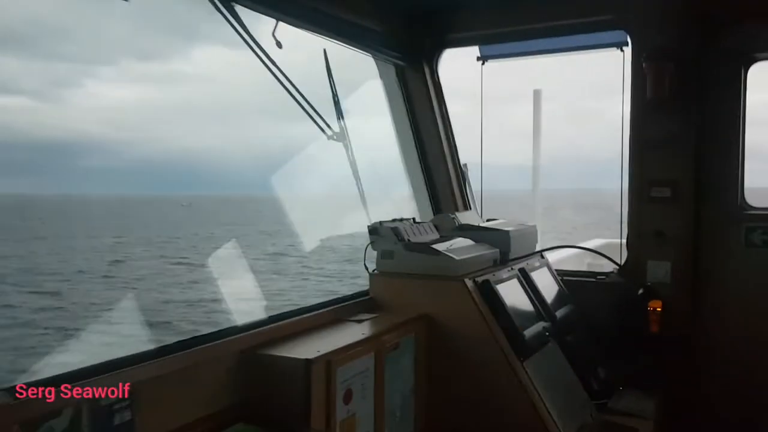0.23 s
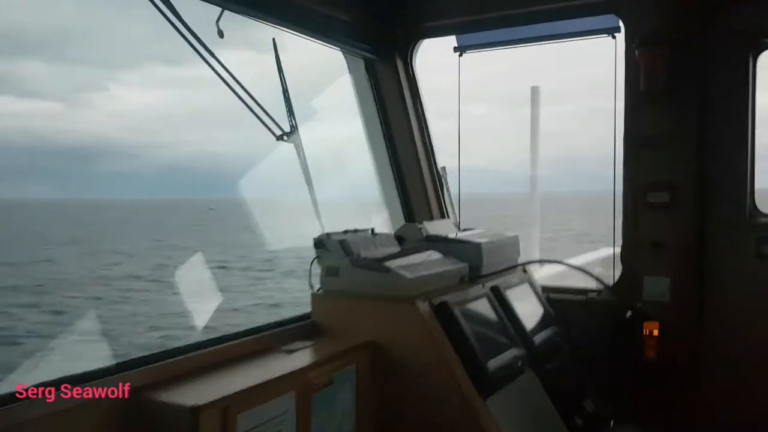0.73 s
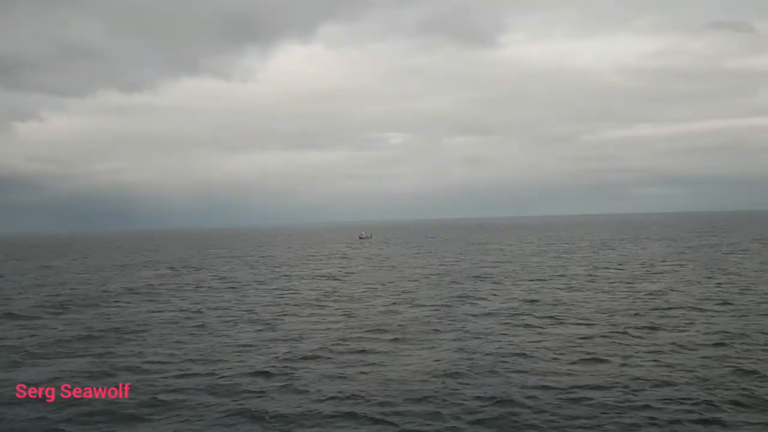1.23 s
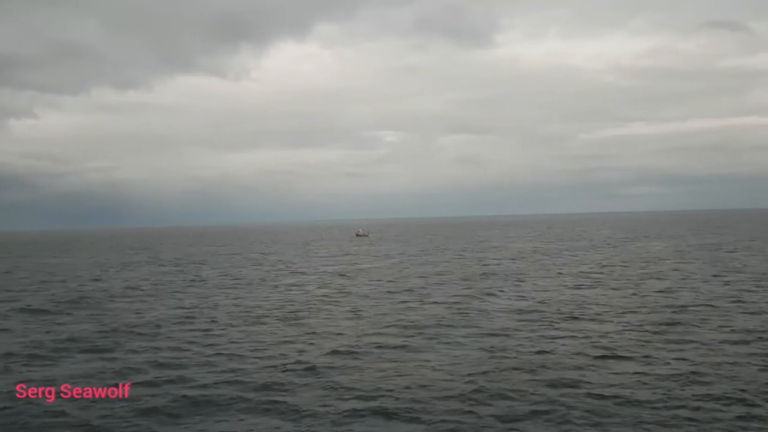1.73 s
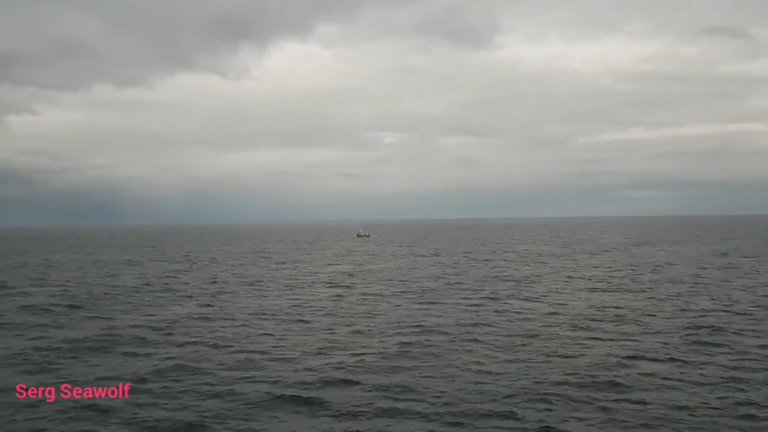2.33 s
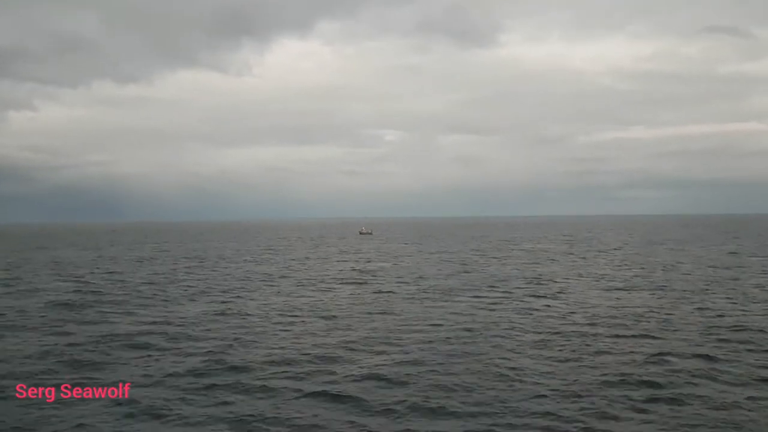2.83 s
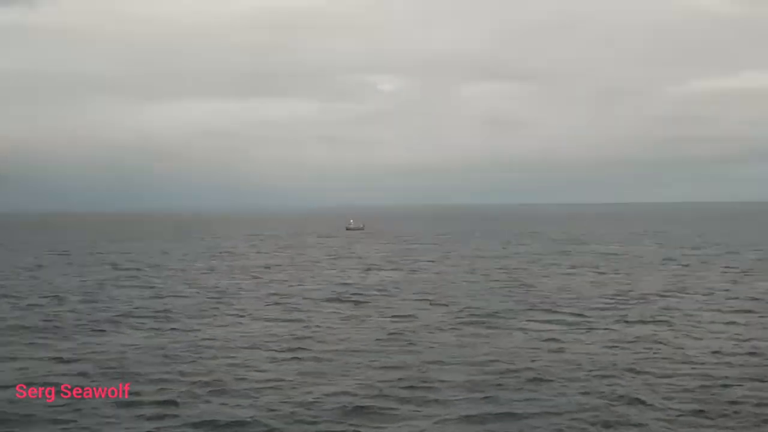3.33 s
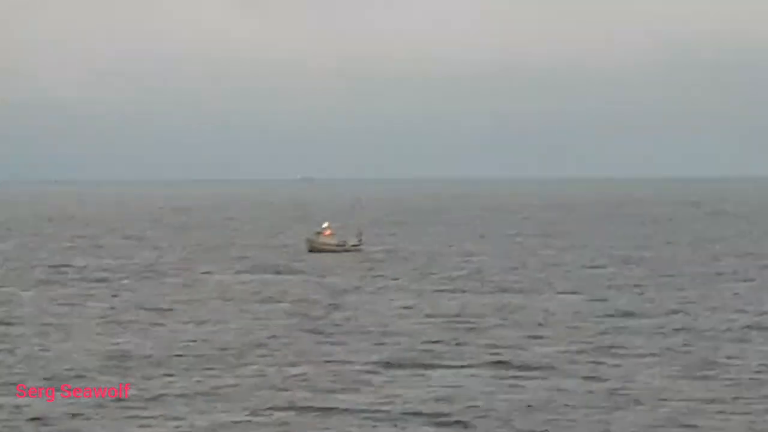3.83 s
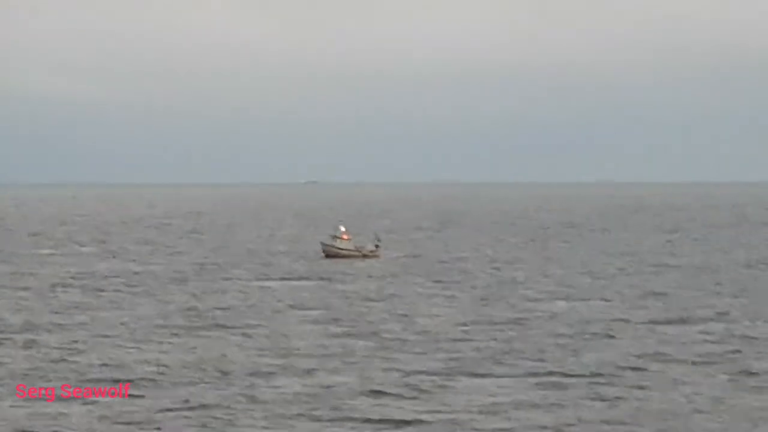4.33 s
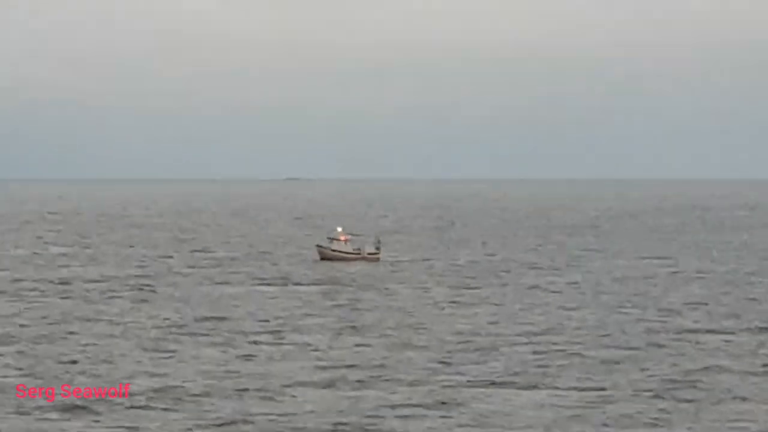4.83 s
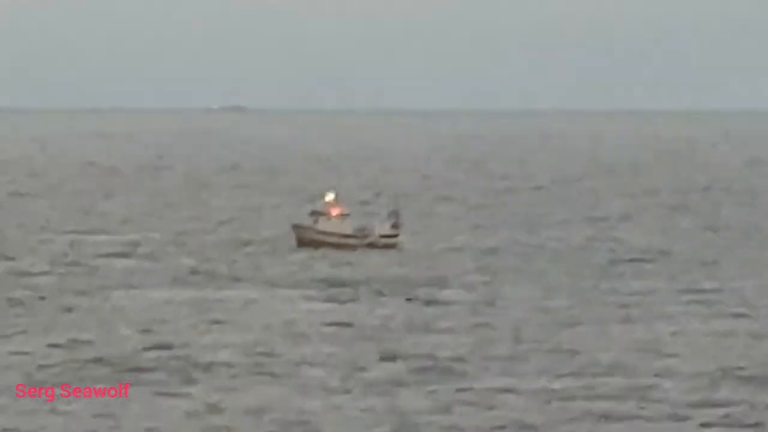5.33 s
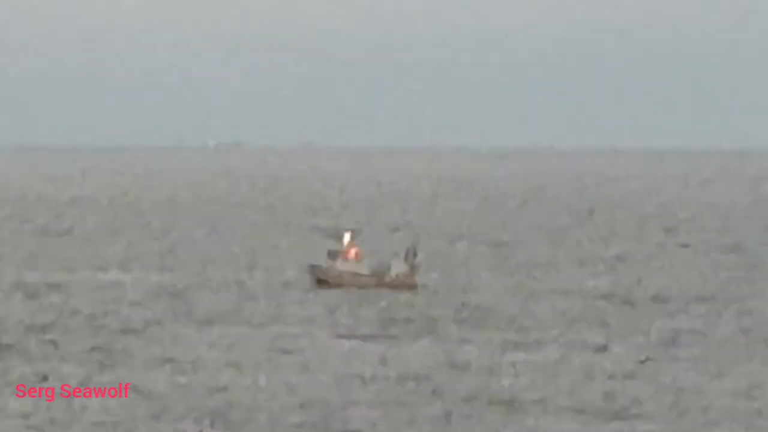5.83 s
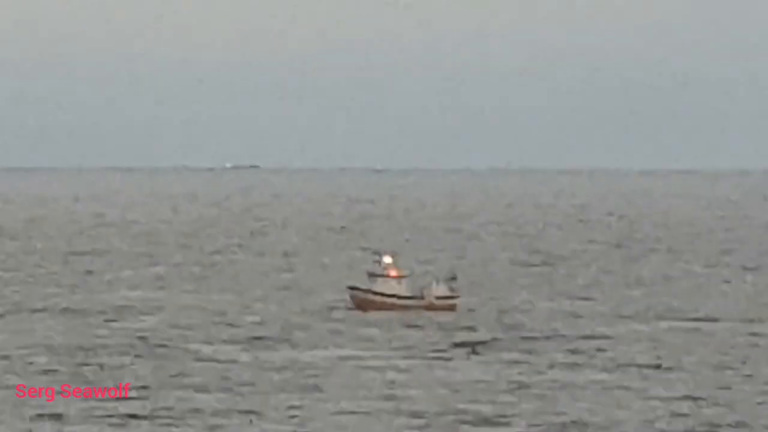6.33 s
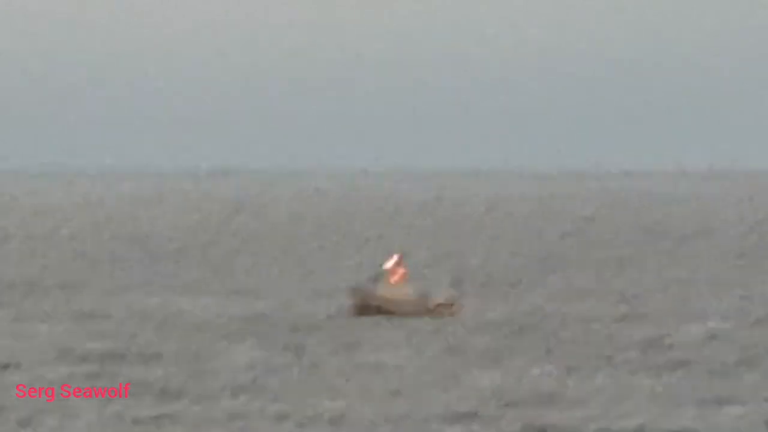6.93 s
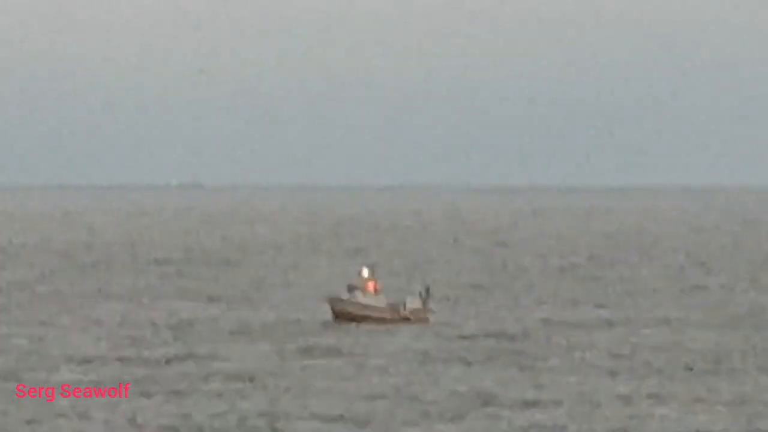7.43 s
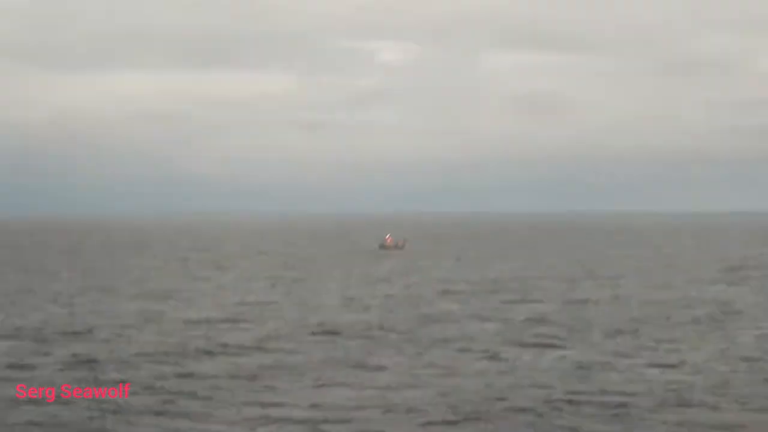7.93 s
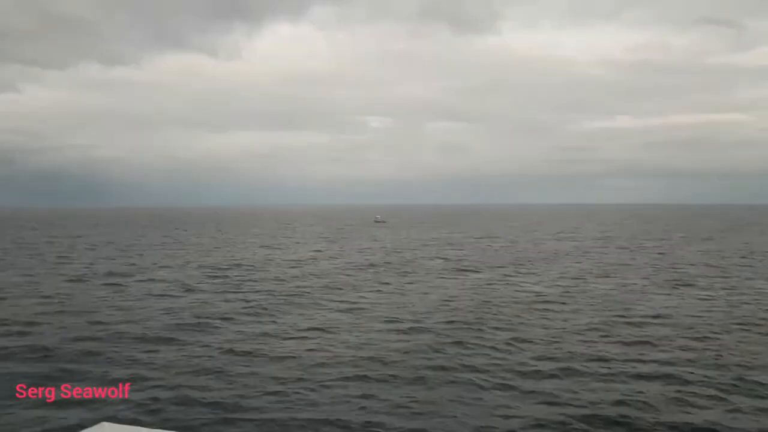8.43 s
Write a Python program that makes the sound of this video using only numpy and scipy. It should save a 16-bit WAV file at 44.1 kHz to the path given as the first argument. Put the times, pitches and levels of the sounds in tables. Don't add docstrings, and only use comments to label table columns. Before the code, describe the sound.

From 0 to 1.65 seconds, a quiet ship's wheelhouse: a low electrical hum around 240 hertz fades beneath faint ventilation tones and dull, dark room noise. At about 1.4 a very soft sleeve swish passes. At 1.65 a small click and hard cut opens onto the deck. Wind now dominates, buffeting a hand-held stereo microphone in low, ragged, fluttering thumps and quick snaps that strike left and right independently. A hard left-heavy burst comes at 2.4, easing around 2.8 to 3.1; strong right-side blows follow at 3.6 and 4.2. It is calmer near 4.8 to 5.1, gusty around 5.3 to 6.2, and lighter from 6.3 to 7. The heaviest slam hits right at 7.4, then buffeting continues to 8.7. Brief crackles mark overloads. Beneath lie steady low engine drone, left-leaning sea wash and thin hiss, rising and falling with gain.

```python
import sys
import numpy as np
from scipy import signal
from scipy.fft import rfft, irfft, next_fast_len
from scipy.io import wavfile
from scipy.ndimage import uniform_filter1d, minimum_filter1d, map_coordinates

SR = 44100
rng = np.random.default_rng(int(sys.argv[2]) if len(sys.argv) > 2 else 0)


def persist_wave(psi):
    counts = np.round(np.clip(psi, -1, 1) * 32767).astype(np.int16)
    wavfile.write(sys.argv[1], SR, np.atleast_2d(counts).T)


def voltage_ratio(level):
    return 10 ** (np.asarray(level, float) / 20)


N = 383229
TIME_S = np.arange(N) / SR
CUT_S = 1.6545


def rms_one(x):
    return x / np.sqrt(np.mean(x ** 2) + 1e-20)


def in_time(rows):
    s, *columns = np.transpose(rows)
    return [np.interp(TIME_S, s, c) for c in columns]


def at_hz(points, hz):
    point_hz, value = np.transpose(points)
    return np.interp(np.log(hz), np.log(point_hz), value)


def band(x, low_hz, high_hz, order):
    return signal.sosfilt(signal.butter(order, [low_hz, high_hz], "band", fs=SR, output="sos"), x)


def drift(rate):
    r = np.exp(-80 * np.pi * rate / SR)
    slow = signal.lfilter([1], [1, -2 * r, r * r], rng.standard_normal(N // 40 + 2002))[2000:]
    return np.interp(np.arange(N) / 40, np.arange(len(slow)), rms_one(slow))


def background(spectrum, direct, left_lag_s, ref_hz):
    size = next_fast_len(N)
    hz = np.maximum(np.arange(size // 2 + 1) * SR / size, 1)
    common, left, right = rfft(rng.standard_normal((3, size)))
    share = np.clip(at_hz(direct, hz), 0, 1)
    one_sided = np.sqrt(share) * common * np.exp(-2j * np.pi * hz * left_lag_s * [[1], [0]])
    diffuse = np.sqrt(1 - share) * np.array([left, right])
    pair = (one_sided + diffuse) * voltage_ratio(at_hz(spectrum, hz))
    level = np.sqrt(2 * np.sum(voltage_ratio(at_hz(spectrum, hz[hz > ref_hz])) ** 2) / size)
    return irfft(pair, size)[:, :N] / level


def tones(lines, wobble_db, wander_rad):
    total = np.zeros(N)
    for hz, level_db in lines:
        level = np.sqrt(2) * voltage_ratio(level_db + wobble_db * drift(8.5))
        total += level * np.sin(2 * np.pi * hz * TIME_S + wander_rad * drift(0.89))
    return total


# (time [s], hiss level [dB])
GAIN = [(1.7, -88.5), (2.31, -84.5), (2.51, -92), (3.35, -85), (3.52, -80), (3.72, -78.5), (3.91, -78.5),
        (4.06, -85.5), (4.29, -90), (4.89, -86), (5.1, -84), (5.6, -78), (6.23, -83), (6.52, -83.5),
        (6.83, -77), (7.08, -77.5), (7.37, -84), (8.6, -84)]


def deck_hiss_db():
    return in_time(GAIN)[0]


# (frequency [Hz], density [dB per Hz])
HISS_SPECTRUM = [(6000, -14), (8100, -7), (9600, -8), (11100, -3), (13100, -1.5), (15100, 1.5),
                 (15800, 1.5), (16200, -39.5)]


def preamp_hiss(outside, hiss_db):
    hiss = background(HISS_SPECTRUM, [(8000, .1), (15000, .65)], left_lag_s=0, ref_hz=11000)
    return hiss * voltage_ratio(np.where(outside, hiss_db + 0.2, -78.3))


# (time [s], transformer hum [dB], room noise [dB])
CABIN_LEVELS = [(0.0, -25, -43.5), (.3, -28.5, -45), (.5, -29.5, -44.5), (.7, -32, -44.5), (.9, -34, -44.5),
                (1.2, -37.5, -45), (1.65, -36.5, -43.5)]
# (frequency [Hz], density [dB per Hz])
CABIN_AIR = [(20, 3), (45, 0), (90, -4.5), (130, -6), (190, -8), (280, -15.5), (400, -22), (600, -25),
             (800, -31), (1100, -31.5), (2000, -43), (3200, -51), (5000, -62.5), (8000, -73)]
# (frequency [Hz], share [0-1])
CABIN_DIRECT = [(61, 1), (310, 0.7), (610, 0.3), (1510, 0.1), (4100, 0.4)]
# (frequency [Hz], level [dB])
CABIN_LINES = [(48.5, -53), (118.5, -39), (560, -61), (592.3, -57.5), (1185, -69.5), (1205, -82.5),
               (1379, -75.5), (3550, -84)]


def wheelhouse():
    hum_db, room_db = in_time(CABIN_LEVELS)
    ventilation = tones(CABIN_LINES, wobble_db=1.8, wander_rad=0.99)
    hum = voltage_ratio(hum_db) * tones([(237.0, 0.2)], wobble_db=1.0, wander_rad=1.0)
    room = voltage_ratio(room_db) * background(CABIN_AIR, CABIN_DIRECT, left_lag_s=-.00044, ref_hz=300)
    return ventilation + hum + room


# (frequency [Hz], density [dB per Hz])
WASH_SPECTRUM = [(20, -14), (45, 3.5), (90, -5), (130, -2.5), (200, -8.5), (300, -20), (450, -24),
                 (700, -26.5), (1100, -29), (1700, -34), (2500, -41), (3600, -51), (5500, -60.5),
                 (8000, -78)]
# (frequency [Hz], share [0-1])
WASH_DIRECT = [(61, 1), (210, 0.99), (610, .61), (2100, 0.16), (5100, 0.047)]


def sea_wash():
    wash = background(WASH_SPECTRUM, WASH_DIRECT, left_lag_s=.00033, ref_hz=300)
    return wash * voltage_ratio(-40.0 + 0.72 * drift(5.4)) * voltage_ratio([[1.6], [-1.6]])


# (frequency [Hz], level [dB])
ENGINE_LINES = [(56.6, -31), (75.3, -30), (113.1, -32.5), (150.6, -41.5), (246, -44), (376.7, -61),
                (1027, -61)]


def engine():
    return tones(ENGINE_LINES, wobble_db=0.8, wander_rad=.75)


def rustle():
    centre_s, level_db, spread_ms = 1.41, -68.5, 67
    bell = np.exp(-.5 * ((TIME_S - centre_s) * 1000 / spread_ms) ** 2)
    return voltage_ratio(level_db) * bell * rms_one(band(rng.standard_normal((2, N)), 2800, 4600, order=2))


# (time [s], peak level [dB], left-right [dB])
TICKS = [(1.6546, -48, -11), (2.176, -65, -6.5), (2.4672, -51, 21.5), (2.515, -62.5, 13),
         (3.9249, -53.5, -17), (4.040, -54, -17), (4.202, -59, -18.5), (5.8772, -49.5, -27),
         (6.0002, -58.5, 20), (8.0608, -64.5, 15.5), (8.1867, -62, 1.5)]


def ticks():
    s, peak_db, pan_db = np.transpose(TICKS)
    fizz_spread_ms, fizz_db = 7.6, -27.5
    clicks = np.zeros((2, N))
    clicks[:, (s * SR).astype(int)] = voltage_ratio(peak_db + 22 + np.minimum(pan_db * [[1], [-1]], 0))
    overloads = clicks * (np.arange(N) > (CUT_S + .01) * SR)
    bell = signal.windows.gaussian(2001, fizz_spread_ms * SR / 1000)
    fizz = signal.fftconvolve(overloads, bell[None], "same") * rng.standard_normal((2, N))
    fizz *= voltage_ratio(fizz_db + 4.1 * drift(120))
    return band(fizz, 3500, 9000, order=2) + band(clicks, 2600, 9500, order=1)


def port_wind(eddies, low_hz, slow_edge, flutter, lumpy_db, trim_db):
    out, reach = np.zeros(N + 40000), 12000
    white = rng.standard_normal((len(eddies), 2 * reach), dtype=np.float32)
    shake = 2 * np.tanh(np.stack([drift(66.5), drift(70.0)]) / 2)
    largest = signal.butter(1, low_hz, "high", fs=SR, output="sos")
    for (s, peak_db, spread_ms, corner_hz), noise in zip(eddies, white):
        half = min(int(5.5 * spread_ms * SR / 1000), reach - 2000)
        need = min(reach, 2 * half + 1500)
        at = round(s * SR) + np.arange(-half, half)
        bell = np.exp(-.25 * ((at / SR - s) * 1000 / spread_ms) ** 2)
        pole = np.exp(-2 * np.pi * np.clip(1.27 * corner_hz, 30, 3000) / SR)
        fall = [[0.74, 0.00087, 0.019, 1, -2 * pole, pole ** 2]] * 2
        pattern = signal.sosfilt(fall, noise[reach - need:reach + need])
        pattern = signal.sosfilt(largest, pattern)
        jolt, lump = shake[:, np.minimum(at, N - 1)]
        gust = np.exp(flutter * jolt)
        travel = np.cumsum((slow_edge + (1 - slow_edge) * bell) * gust)
        swept = map_coordinates(pattern, [need + travel - travel[half]], order=3, mode="mirror")
        swept *= bell * voltage_ratio(lumpy_db * lump) * gust
        strength = np.sqrt(np.sum(band(swept, 100, 2400, order=2) ** 2) / np.sum(bell ** 2))
        out[at] += voltage_ratio(peak_db + trim_db) * swept / strength
    return out[:N]


def shed(strength):
    every_s, spread_ms, corner_at_ref_hz = .045, 12.0, 260
    beat = np.arange(1.72, N / SR, every_s)
    late, louder, longer, brighter = rng.standard_normal((len(beat), 4)).T
    s = beat + .3 * every_s * late
    db = np.interp(s, *np.transpose(strength)) + 2.5 * louder
    octaves = 0.1068 * (db + 22.5) + .6 * np.tanh(brighter)
    return list(zip(s, db, spread_ms * np.exp(.45 * longer), corner_at_ref_hz * 2 ** octaves))


# (time [s], strength [dB])
LEFT_BREEZE = [(1.7, -31.5), (1.86, -24), (2.26, -26.5), (2.55, -14.5), (2.8, -26.5), (2.96, -29),
               (3.3, -25), (3.58, -27.5), (3.85, -22), (4.45, -25.5), (4.75, -40), (5.35, -25.5),
               (6.05, -24), (6.38, -40.5), (7.1, -26), (7.55, -29.5), (7.8, -21.5), (8.69, -19.5)]
RIGHT_BREEZE = [(1.74, -23.5), (1.84, -34.5), (2.3, -24.5), (2.65, -21.5), (2.9, -42.5), (3.2, -35),
                (3.42, -24.5), (3.78, -29), (4.1, -17.5), (4.6, -28.5), (5.1, -33.5), (5.9, -30.5),
                (6.3, -35), (7.05, -34), (7.4, -17.5), (7.85, -25.5), (8.15, -36.5), (8.69, -20)]


def breeze():
    return [port_wind(shed(strength), low_hz=69.0, slow_edge=.7, flutter=0.12, lumpy_db=3.0, trim_db=0.5)
            for strength in (LEFT_BREEZE, RIGHT_BREEZE)]


# (time [s], peak level [dB], corner [Hz])
LEFT_SNAPS = [(1.855, -29.5, 350), (2.21, -24, 350), (2.342, -7.5, 450), (2.384, -8, 1060),
              (2.467, -17, 900), (2.495, -12, 850), (2.528, -18.5, 703), (2.566, -17.5, 890),
              (2.59, -20, 950), (2.659, -15, 694), (3.059, -24.5, 650), (3.164, -28, 380),
              (3.773, -23, 850), (3.856, -15.5, 454), (3.951, -16, 600), (4.103, -19.5, 470),
              (4.205, -16, 950), (5.178, -19, 483), (5.221, -22.5, 680), (6.001, -16, 750),
              (7.016, -24.5, 350), (7.378, -13.5, 1195), (7.75, -13, 407), (7.786, -12.5, 560),
              (7.812, -12.5, 760), (8.013, -17.5, 610), (8.066, -17.5, 937), (8.142, -19.5, 600),
              (8.578, -19.5, 890), (8.6, -14, 624)]
RIGHT_SNAPS = [(2.003, -22.5, 800), (2.172, -30, 640), (2.429, -13.5, 1060), (2.512, -23, 600),
               (2.613, -21, 780), (3.307, -21.5, 610), (3.38, -25, 680), (3.457, -13, 447),
               (3.974, -23.5, 520), (4.039, -14, 650), (4.229, -21, 594), (4.503, -15.5, 513),
               (4.527, -25, 843), (4.717, -17.5, 427), (4.969, -28.5, 300), (5.587, -22, 400),
               (5.878, -13, 600), (5.932, -18, 800), (6.474, -25.5, 447), (7.228, -16, 620),
               (7.257, -13.5, 580), (7.279, -24.5, 686), (7.433, -5.5, 840), (7.567, -16, 745),
               (7.65, -17, 576), (7.73, -22, 720), (8.228, -15, 685), (8.251, -9, 750), (8.275, -18, 750),
               (8.677, -14, 420)]


def snaps():
    spread_ms = 2.83
    pair = []
    for rows in (LEFT_SNAPS, RIGHT_SNAPS):
        whirls = [(s, db, spread_ms, hz) for s, db, hz in rows]
        pair.append(port_wind(whirls, low_hz=260.0, slow_edge=.8, flutter=0.025, lumpy_db=6.5, trim_db=1.5))
    return pair


# (time [s], peak level [dB], spread [ms], corner [Hz])
LEFT_EDDIES = [(1.97, -21.5, 17.5, 270), (2.103, -20.5, 12.7, 243), (2.395, -7, 20, 400),
               (2.471, -9, 12.6, 570), (2.506, -13, 9.4, 745), (2.612, -11, 16, 817),
               (2.71, -17.5, 18, 420), (3.05, -19.5, 16.3, 380), (3.342, -18.5, 9.2, 167),
               (3.485, -15, 6.6, 205), (3.707, -12, 15.6, 246), (3.775, -13, 16, 407),
               (3.858, -13.5, 14, 247), (3.985, -9, 11.1, 488), (4.275, -18, 8.9, 493),
               (4.39, -20.5, 32.3, 366), (5.21, -24, 17, 351), (5.29, -13.5, 17.7, 284),
               (5.585, -13, 8.9, 280), (5.899, -14, 25.4, 270), (6.0, -12.5, 16, 456),
               (6.192, -13.5, 23, 261), (7.234, -14.5, 18, 237), (7.309, -12.5, 10.6, 239),
               (7.39, -11.5, 13.6, 420), (7.647, -11, 8.2, 444), (8.073, -11.5, 11, 518),
               (8.141, -12, 11, 330), (8.44, -17, 27, 267), (8.59, -10.5, 28.2, 380)]
RIGHT_EDDIES = [(2.009, -18.5, 9.7, 400), (2.166, -17, 8.8, 419), (2.3, -15, 17, 173),
                (2.428, -16, 18, 300), (2.579, -15, 30, 260), (2.679, -20.5, 14.3, 249),
                (3.203, -16.5, 12.6, 227), (3.391, -13.5, 31.6, 452), (3.613, -5.5, 12.9, 235),
                (3.924, -10, 11.4, 365), (3.964, -8.5, 12, 333), (4.085, -10.5, 32, 370),
                (4.162, -6, 15, 750), (4.209, -8, 13.7, 564), (4.545, -19.5, 29.2, 368),
                (4.754, -22, 17.6, 430), (5.625, -11, 21, 220), (5.89, -7.5, 17, 300),
                (5.937, -10.5, 9.5, 402), (6.492, -19, 26.4, 224), (7.177, -10, 7, 226),
                (7.234, -11.5, 17.3, 466), (7.305, -11.5, 36, 382), (7.392, -2, 9.8, 505),
                (7.45, -9, 28.5, 560), (7.562, -15.5, 21, 476), (7.7, -21, 44, 380),
                (7.935, -14.5, 23.8, 220), (8.276, -8.5, 25.8, 430), (8.515, -11, 8.9, 324)]


def big_eddies():
    return [port_wind(rows, low_hz=66.0, slow_edge=.63, flutter=0.2386, lumpy_db=4.0, trim_db=-0.4)
            for rows in (LEFT_EDDIES, RIGHT_EDDIES)]


def wind():
    pressure = np.add(big_eddies(), snaps()) + breeze()
    pressure /= (1 + (pressure / .97) ** 4) ** (1 / 4)
    return signal.sosfilt(signal.butter(4, 3200.0, fs=SR, output="sos"), pressure)


def scene():
    outside = np.clip((TIME_S - CUT_S) / .0008, 0, 1)
    hiss_db = deck_hiss_db()
    gain = voltage_ratio(hiss_db + 78)
    deck = gain * (sea_wash() + engine()) + wind()
    places = outside * deck + (1 - outside) * wheelhouse()
    return places + ticks() + rustle() + preamp_hiss(outside, hiss_db)


def band_limit(x):
    return signal.sosfilt(signal.butter(12, 15770, fs=SR, output="sos"), x)


def record(dry):
    x = signal.sosfilt(signal.butter(2, 47.0, "high", fs=SR, output="sos"), dry)
    room = np.minimum(1, .95 / (np.abs(x) + 1e-9))
    held = minimum_filter1d(room, 161)
    mix = x * uniform_filter1d(uniform_filter1d(held, 81), 81)
    return band_limit(mix)


dry = scene()
out = record(dry)
persist_wave(out)
```